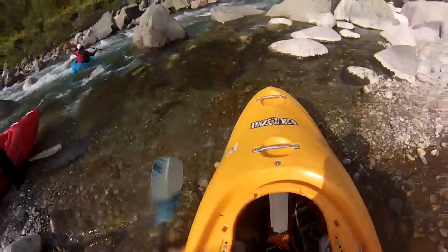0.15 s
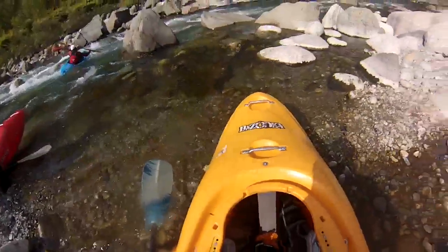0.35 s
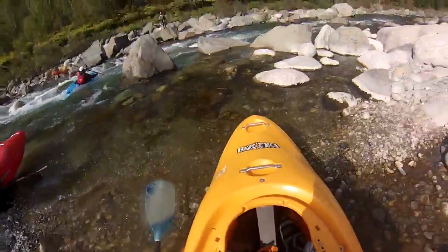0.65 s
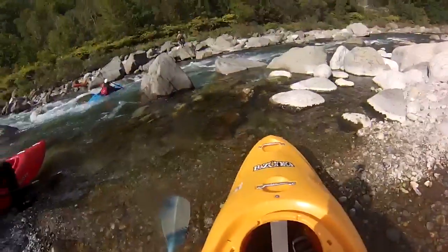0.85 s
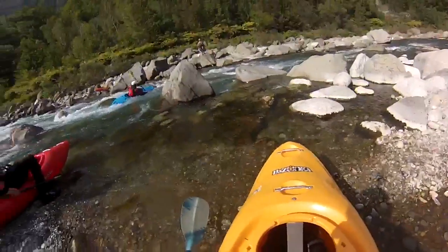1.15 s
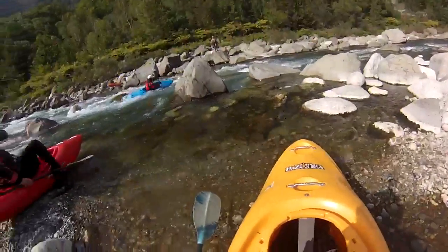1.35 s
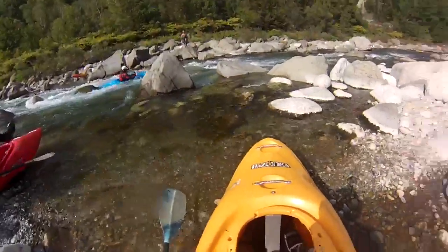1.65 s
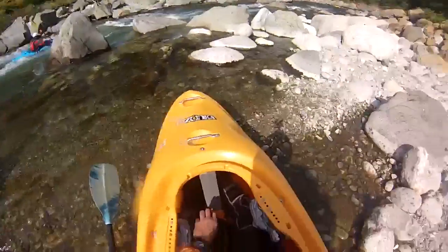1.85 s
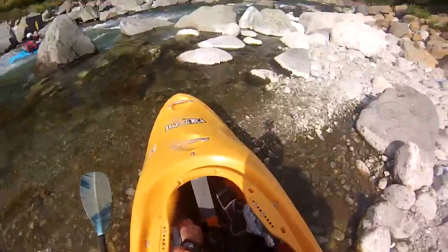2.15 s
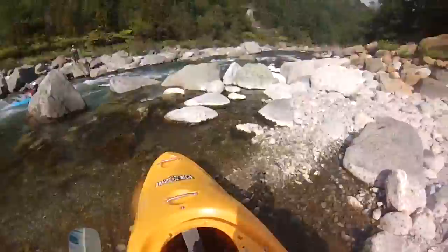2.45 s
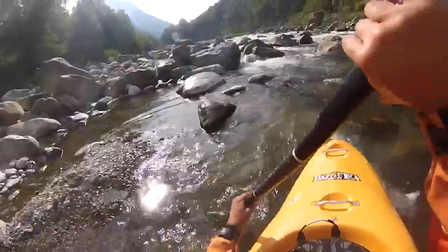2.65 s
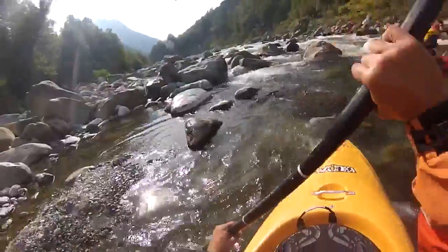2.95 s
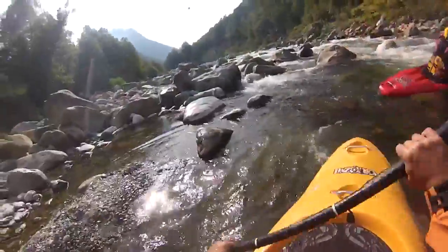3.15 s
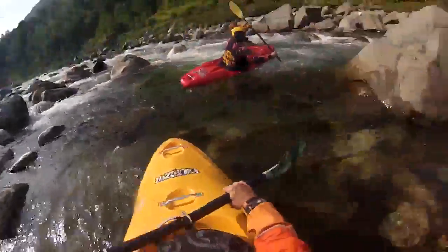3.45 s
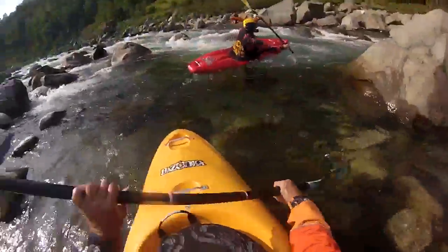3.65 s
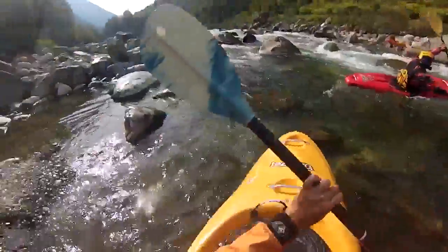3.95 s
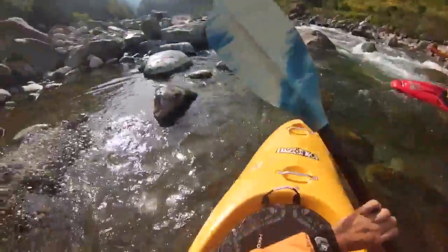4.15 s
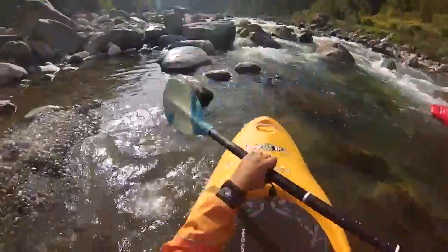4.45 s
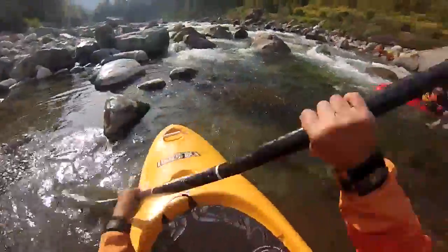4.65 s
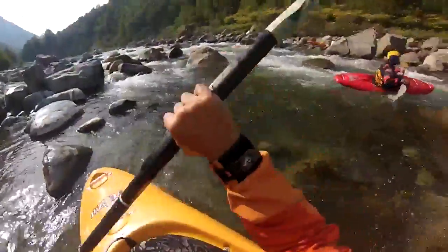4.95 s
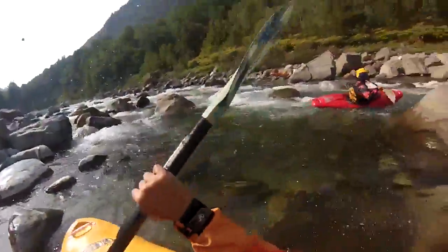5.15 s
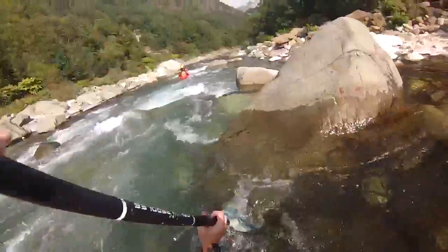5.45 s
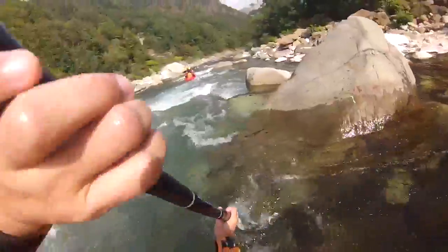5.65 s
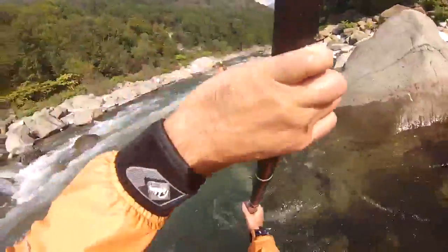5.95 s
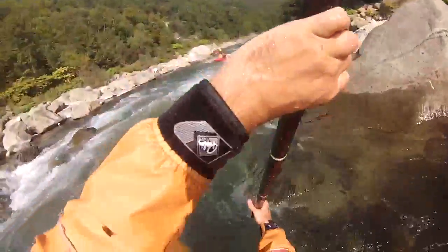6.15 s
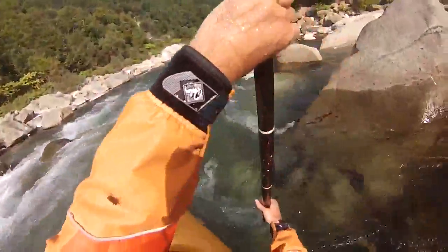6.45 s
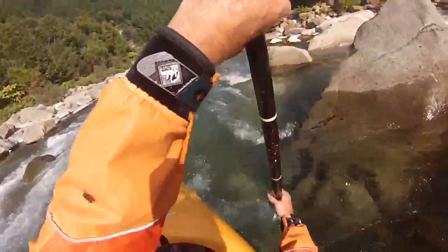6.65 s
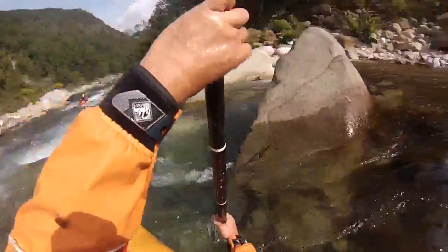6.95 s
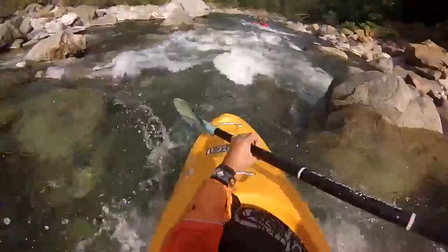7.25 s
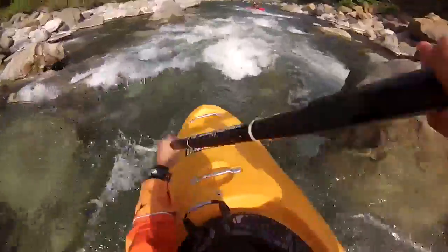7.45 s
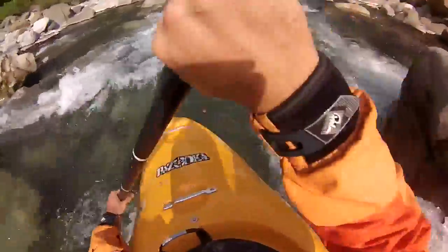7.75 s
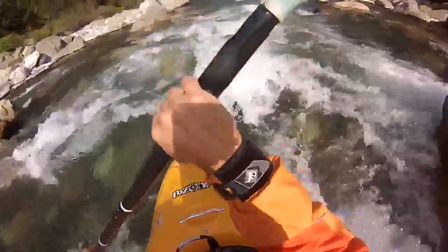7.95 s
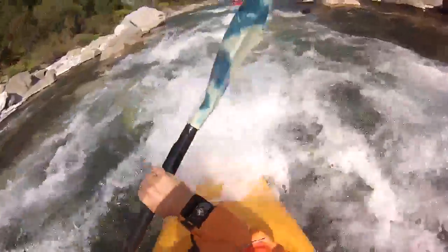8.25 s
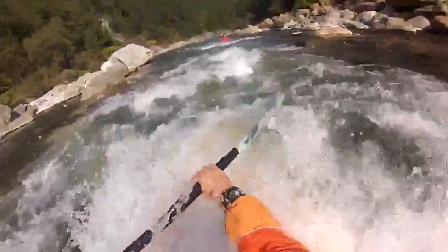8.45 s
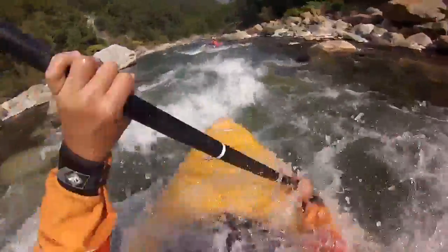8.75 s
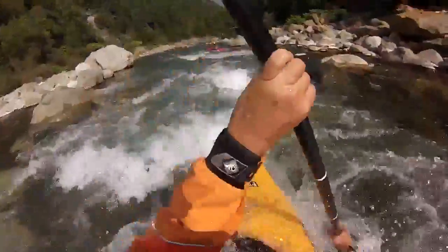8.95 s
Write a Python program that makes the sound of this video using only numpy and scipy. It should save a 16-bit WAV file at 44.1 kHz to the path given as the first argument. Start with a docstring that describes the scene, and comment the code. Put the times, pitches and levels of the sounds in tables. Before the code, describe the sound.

Heard from a kayaker's helmet through a sealed plastic housing, boxy and resonant. From 0 to 2.5 s, deep wind rumble, strongest at the very start, lies over the steady rush of rapids, with tiny drips, a dull hull plop near 1.4 s and a wind thump with a hollow knock at 2 s. A short fade to silence with a faint pop follows. From 2.6 to 3.05 s quick paddle splashes and pouring water burst out, then flowing water; plops and wind thumps come around 4 to 4.4 s, and sharp wet strokes from 4.7 to 5.05 s. After a gap at 5.25 s the rush grows fuller, with airy wind flurries. Another gap at 7.2 s leads to hull plops at 7.5 to 7.8 s and a loud, hissing whitewater surge peaking near 8.3 s, with splashes and buffeting until 8.8 s. A final gap at 9 s leaves a quieter wash.

```python
"""Wind buffets the microphone first, mostly deep rumble, over the broad roar of river rapids.
The microphone rides a kayaker's helmet in a sealed plastic housing, whose resonances colour the water noise.
Churn lies against the hull, roar far off, wash nearer, spray and mist on top: noises, some with bubble chirps.
Drops tick, paddle splashes ring and the hull plops, each a decaying tone with a burst of noise.
Five stretches of river, each with its own balance of water, are joined by short fades to silence."""
import sys
import numpy as np
from scipy import signal
from scipy.fft import rfft, irfft, next_fast_len
from scipy.io import wavfile
from scipy.ndimage import uniform_filter1d

SR = 44100
rng = np.random.default_rng(int(sys.argv[2]) if len(sys.argv) > 2 else 0)


def digitize_waveform(pressure):
    """Quantize a signal to 16-bit integers and store it at the path in sys.argv[1].

    Rows of a 2-D input are taken as channels; values are limited to [-1, 1].
    """
    field = np.atleast_2d(pressure).T
    bounded = np.clip(field, -1, 1)
    quanta = np.round(bounded * 32767).astype(np.int16)
    wavfile.write(sys.argv[1], SR, quanta)


N = 402191


def amp(db):
    """Decibels to gain."""
    return 10 ** (np.asarray(db) / 20)


def evened(x):
    """Scales to rms 1."""
    return x / np.sqrt(np.mean(x ** 2) + 1e-20)


def read(points, hz):
    """Reads a spectrum on a log-frequency axis."""
    f, value = np.transpose(points)
    return np.interp(np.log(hz + 1), np.log(f + 1), value)


def curves(rows):
    """One curve per column of a table after the time, at every sample."""
    s, *columns = np.transpose(rows)
    t = np.arange(N) / SR
    return np.array([np.interp(t, s, column) for column in columns])


def add(mix, s, sound):
    """Mixes a sound in at time s, cut off at the end of the mix."""
    start = max(round(s * SR), 0)
    part = mix[start:][:len(sound)]
    part += sound[:len(part)]


def coloured(spectrum):
    """Steady noise from one long transform, fine enough in frequency for the deep bass."""
    size = next_fast_len(N, real=True)
    hz = np.fft.rfftfreq(size, 1 / SR)
    bins = rfft(rng.standard_normal(size)) * amp(read(spectrum, hz))
    return evened(irfft(bins, size)[:N])


def wind(steadiness=0.61):
    """Turbulence on the microphone port: lumpy rumble in gusts, faster air in flurries, hard buffets."""
    # gusts: (time [s], strength [dB])
    gust_points = [(0, -19.5), (.12, -29), (.45, -34.5), (.8, -26.5), (1.1, -33.5), (1.3, -29),
                   (1.6, -36.5), (1.95, -26.5), (2.4, -33), (2.75, -30.5), (3.0, -34), (3.35, -33.5),
                   (3.6, -35), (4.2, -24.5), (4.32, -34.5), (4.55, -33.5), (4.95, -29), (5.08, -31),
                   (5.16, -35.5), (6.0, -36.5), (6.16, -29.5), (6.24, -36.5), (6.6, -37), (6.85, -34.5),
                   (7.15, -35), (7.5, -32.5), (7.8, -30.5), (8.3, -31), (8.6, -27), (9.12, -34)]
    # deep turbulence: (frequency [Hz], relative density [dB per Hz])
    rumble_spectrum = [(4.7, 2.5), (8.0, 1), (21, 2.5), (41, -2.5), (49, -10), (56, -11.5), (62, -41),
                       (70, -47), (110, -39), (140, -62), (240, -120)]
    # faster air: (frequency [Hz], relative density [dB per Hz])
    whoosh_spectrum = [(40, -24), (60, 30), (85, 16.5), (120, 10.5), (200, -37.5)]
    # flurries of faster air: (middle [s], half-width to 1/e [s], level [dB])
    flurry_rows = [(0, .03, -57), (.3, 0.16, -55), (1.6, 0.11, -62), (2.01, 0.022, -35), (3.0, 0.27, -55.5),
                   (5.8, .06, -43.5), (6.03, 0.24, -42.5), (6.84, 0.065, -35.5), (7.87, 0.042, -46),
                   (8.41, 0.036, -48), (8.62, 0.051, -40), (8.84, .06, -45.5)]
    # single strong buffets: (middle [s], level [dB], pitch [Hz], push + or pull - [gain])
    buffet_rows = [(2.008, -10, 38, 1), (2.152, -18, 29.3, 0.97), (2.71, -19, 14.6, 0.97),
                   (3.337, -23, 25, -1.1), (4.063, -14.5, 27, -0.91), (4.409, -13.5, 22, -1),
                   (6.851, -19, 30, -0.87), (7.782, -24.5, 18, 1), (8.179, -16.5, 24.5, 1),
                   (8.377, -20, 28, 1), (8.589, -10, 24.4, -0.69), (8.627, -15.5, 18, 0.86),
                   (8.798, -19.5, 18.6, -1)]
    whoosh_db = -33  # steady airflow, relative to the gust strength

    t = np.arange(N) / SR
    gust = amp(curves(gust_points)[0])
    flurry = sum(amp(db) * np.exp(-((t - s) / width) ** 2) for s, width, db in flurry_rows)

    rumble = coloured(rumble_spectrum)
    # dividing by part of its own loudness makes the rumble steadier, yet still lumpy
    lumps = uniform_filter1d(abs(rumble), size=3000) + 0.064
    out = gust * evened(rumble / lumps ** steadiness)
    out += (gust * amp(whoosh_db) + flurry) * coloured(whoosh_spectrum)

    t = np.arange(-3000, 3000) / SR
    for s, db, hz, sign in buffet_rows:
        u = (np.pi * hz * t) ** 2
        lump = (1 - 2 * u) * np.exp(-u)  # one pressure lump with a rebound either side
        add(out, s + t[0], sign * amp(db) * lump)
    return out


def noise(spectrum, size, patchy_db=0., flicker_db=0.):
    """Random short-time spectra with drifting patches and a flicker shared by all bands."""
    frames, hz = 4 * N // size + 5, np.fft.rfftfreq(size, 1 / SR)
    real, imaginary, patches = rng.standard_normal((frames, len(hz), 3)).T
    # patches are smoothed over frequency, then over time
    patches = uniform_filter1d(patches, size=8, axis=0)
    patches = evened(uniform_filter1d(patches, size=12, axis=1))
    flicker = evened(uniform_filter1d(rng.standard_normal(frames), size=3))
    level_db = read(spectrum, hz)[:, None] + patchy_db * patches + flicker_db * flicker
    bins = (real + 1j * imaginary) * amp(level_db)
    return evened(signal.istft(bins, nperseg=size, noverlap=3 * size // 4)[1][:N])


def housing(x):
    """Sealed shell: a flat leak plus cavity resonances, as a causal (minimum-phase) filter."""
    # cavity resonances: (frequency [Hz], width [Hz], gain over the flat leak [dB])
    resonances = [(1100, 450, 5), (690, 150, 0.5), (1449, 320, 13), (1658, 180, 6), (2395, 480, 14),
                  (3120, 160, 4), (3600, 520, 4.5), (4020, 310, 0.5), (4900, 270, 3), (5370, 270, 4),
                  (6600, 910, -5), (7830, 430, 1.5), (10440, 1000, -4)]
    hz = abs(np.fft.fftfreq(4096, 1 / SR))
    power = 1 + sum(amp(db) ** 2 / (1 + (2 * (hz - f) / w) ** 2) ** 2 for f, w, db in resonances)
    log_gain = np.log(power) / 2
    phase = -signal.hilbert(log_gain).imag
    taps = np.fft.ifft(np.exp(log_gain + 1j * phase)).real[:2048]
    return signal.oaconvolve(x, taps)[:len(x)]


def bubbles(per_s, lo_hz, hi_hz, cycles, spread_db):
    """Bursting bubbles: short rising chirps at nine pitches, many weak and a few strong."""
    strength = amp(spread_db * np.minimum(rng.exponential(1, N), 5))
    strength = strength * (rng.random(N) < per_s / SR)
    kind, out = rng.integers(0, 9, N), np.zeros(N)
    for k, hz in enumerate(np.geomspace(lo_hz, hi_hz, num=9)):
        turns = np.arange(0, 3 * cycles, hz / SR)
        chirp = np.sin(2 * np.pi * turns * (1 + 0.028 * turns)) * np.exp(-turns / cycles * 2)
        out += signal.oaconvolve(strength * (kind == k), chirp)[:N]
    return evened(out)


def water_levels():
    """Gain of each water layer: the stretch's balance, lifted by the swell, with pours added in power."""
    # stretches of river: (start [s], churn round the hull [dB], far roar [dB], nearer wash [dB],
    # spray [dB], fine mist [dB]), all before the swell
    stretches = np.array([(0, -55, -55, -62, -63.5, -70), (2.556, -51.5, -58, -58.5, -62.5, -70),
                          (5.29, -51.5, -52.5, -55.5, -63, -68.5), (7.256, -49, -48.5, -51, -53.5, -59.5),
                          (9.056, -56, -55.5, -51, -59, -63)])
    # as the boat nears white water all layers swell:
    # (time [s], swell [dB], extra churn against the hull [dB])
    swell_rows = [(0, 1.5, 3), (.08, -0.5, 1.5), (.5, -2.1, .5), (1.6, -2.3, 0), (2.5, -1.2, 0.7),
                  (3.5, -0.7, -1.6), (4.3, 0.5, 0.5), (5.25, 3.5, -2), (5.33, 2.4, -2), (6.0, 3.8, 1),
                  (6.4, 5, 0), (7.2, 5, -1), (7.3, -0.8, -2.5), (7.6, -1, 3.5), (7.82, 3.5, 4.5),
                  (8.25, 8.5, 1), (8.6, 6.5, 3.5), (9.0, 4.5, 2), (9.1, -6.5, 1)]
    # response to the swell: (churn, roar, wash, spray, mist) [dB per dB]
    follow = (.3, .7, .9, .95, 1.05)
    # water pouring off a paddle or over a rock:
    # (start [s], time until it falls [s], level [dB], brightness [dB per layer])
    pour_rows = [(0.714, 0.29, -64.5, 8), (1.17, .12, -65, 7), (2.61, 0.14, -52, -1),
                 (2.752, 0.14, -48, -.3), (2.956, 0.051, -51, .3), (4.386, 0.12, -55.5, 4),
                 (4.73, 0.069, -61.5, -19), (4.825, 0.08, -44, -.3), (4.903, 0.059, -43, -1),
                 (5.023, 0.086, -51, 1), (8.51, 0.12, -44.5, -11)]
    # balance of a pour: (roar, wash, spray, mist) [dB]
    pour_balance = np.array((-8.5, -1.7, -12, -21.5))
    rise_s, fall_s = 0.016, 0.038  # linear rise, fall to 1/e

    t = np.arange(N) / SR
    swell_db, churn_db = curves(swell_rows)
    stretch_db = stretches[np.searchsorted(stretches[1:, 0], t), 1:].T
    gain = amp(stretch_db + np.outer(follow, swell_db))
    gain[0] *= amp(churn_db)

    power = gain ** 2
    for start, length, db, bright_db in pour_rows:
        rise = np.clip((t - start) / rise_s, 0, 1)
        fall = np.exp(-np.maximum(t - start - length, 0) / fall_s)
        layer_db = db + pour_balance + bright_db * np.arange(-1, 3)
        power[1:] += np.outer(amp(layer_db), rise * fall) ** 2
    return np.sqrt(power)


def river():
    """Churn, roar, wash, spray and mist: dense noise, with bubbles standing out of three of them."""
    # water against the hull: (frequency [Hz], relative density [dB per Hz])
    churn_spectrum = [(60, -2), (110, 0.5), (200, -3.5), (400, -4.5), (800, -9), (1300, -16), (2500, -42)]
    # far rapids: (frequency [Hz], relative density [dB per Hz])
    roar_spectrum = [(500, -46), (900, -5), (1400, 4), (1900, -2), (2600, -13.5), (5000, -27)]
    # nearer water: (frequency [Hz], relative density [dB per Hz])
    wash_spectrum = [(500, -26), (750, 0.5), (1400, -14.5), (2000, 1.5), (2600, -8.5), (3300, -7.5),
                     (5000, -15), (9000, -66)]
    # spray: (frequency [Hz], relative density [dB per Hz])
    spray_spectrum = [(1200, -16), (2400, -4), (3500, 2.5), (5000, 5.5), (6500, -5), (7500, -16),
                      (10000, -45)]
    # fine mist: (frequency [Hz], relative density [dB per Hz])
    mist_spectrum = [(4000, -33), (6000, 5.5), (7600, -1.5), (8400, -5.5), (9300, -8), (11500, -8.5),
                     (13000, -15), (15500, -20)]

    churn = noise(churn_spectrum, size=1024, patchy_db=-0.5)
    churn += 0.36 * bubbles(65, 152.0, 832, 15.0, 2.8)
    roar = noise(roar_spectrum, size=512, patchy_db=.6, flicker_db=.4)  # distant, so smooth: no bubbles
    wash = noise(wash_spectrum, size=512, patchy_db=1.3, flicker_db=0.25)
    wash += .5 * bubbles(300, 959, 3270, 3.4, 2.3)
    spray = noise(spray_spectrum, size=256, patchy_db=-0.5, flicker_db=1.16)
    spray += 0.43 * bubbles(900, 3000, 6080, 16.0, 1.7)
    mist = noise(mist_spectrum, size=256, patchy_db=0.95, flicker_db=1.5)
    layers = [churn, roar, wash, spray, mist]
    return sum(gain * evened(housing(layer)) for gain, layer in zip(water_levels(), layers))


def electronics():
    """Faint hiss of the microphone electronics and thin steady whines of the camera's."""
    # microphone hiss: (frequency [Hz], relative density [dB per Hz])
    hiss_spectrum = [(2000, -15), (8000, -5), (12000, -4.5), (15500, -13)]
    # camera whines: (frequency [Hz], rms level [dB])
    whine_rows = [(10492, -95), (12290, -96), (13964, -93)]
    hiss_db = -75  # rms
    t = np.arange(N) / SR
    whine = np.zeros(N)
    for hz, db in whine_rows:
        whine += np.sqrt(2) * amp(db) * np.sin(2 * np.pi * (hz * t + rng.random()))
    return amp(hiss_db) * noise(hiss_spectrum, size=512) + whine


def burst(white, centre_hz, octaves):
    """A short noise coloured round one centre and heard through the housing."""
    hz = np.fft.rfftfreq(len(white), 1 / SR)
    colour = np.exp(-(np.log2(hz / centre_hz + 1e-9) / octaves) ** 2)
    return evened(housing(irfft(rfft(white) * colour, len(white))))


def ticks():
    """Small drops on hard surfaces: a bright spit with a short tone ringing in it."""
    # drops: (time [s], level [dB], ring pitch [Hz])
    drop_rows = [(0.0473, -52, 5030), (0.0857, -50, 5100), (0.1181, -51, 5030), (0.1506, -51, 5140),
                 (0.2094, -47.5, 4960), (0.3651, -50, 4830), (0.9244, -54, 6130), (0.974, -51, 6100),
                 (1.1994, -55, 7600), (1.9245, -50, 4600), (2.0073, -48, 3580), (2.5057, -42, 3500),
                 (2.6287, -40.5, 3500), (2.662, -44, 4850), (2.7636, -37.5, 3530), (2.816, -35, 3500),
                 (2.8424, -34.5, 3660), (2.8564, -43, 3600), (2.8759, -53, 3600), (2.9991, -47, 4750),
                 (3.0185, -44, 3500), (3.9983, -49, 3660), (4.4014, -52, 5160), (4.67, -43, 4900),
                 (4.8319, -43, 4900), (4.849, -41, 3550), (4.8898, -45, 3940), (4.982, -41, 3750),
                 (5.039, -46, 4420), (5.0944, -48, 4070), (6.6004, -54, 4060), (7.6016, -40, 4160),
                 (8.1194, -35.5, 6260), (8.8075, -33.5, 3440)]
    t60_s = 0.033
    out, t = np.zeros(N), np.arange(3072) / SR
    for s, db, hz in drop_rows:
        spit = burst(rng.standard_normal(len(t)), np.sqrt(hz * 5200), .6)
        bead = np.sin(2 * np.pi * hz * t)
        onset = 1 - np.exp(-t / 0.0004)
        add(out, s, amp(db - 60 * t / t60_s) * (.6 * spit + .45 * bead) * onset)
    return out


def splashes():
    """A trapped bubble rings and rises in pitch inside a wide slap of noise."""
    # slaps of water: (time [s], level [dB], starting bubble pitch [Hz])
    slap_rows = [(0.366, -43, 1370), (2.007, -40, 610), (2.615, -34, 2120), (2.634, -33, 2030),
                 (2.658, -39, 2400), (2.686, -33, 2110), (2.698, -34, 1050), (2.739, -32.5, 1530),
                 (2.767, -36, 2470), (2.8, -33.5, 1040), (2.816, -35, 2180), (2.824, -29, 1860),
                 (2.877, -31, 2400), (2.942, -39, 2540), (3.017, -47, 1350), (3.045, -40.5, 1460),
                 (4, -34.5, 800), (4.012, -39, 920), (4.301, -38, 710), (4.31, -51, 1150),
                 (4.511, -41, 1930), (4.673, -25, 2396), (4.676, -28, 1244), (4.789, -37, 1240),
                 (4.805, -37, 1680), (4.831, -36, 2430), (4.848, -31, 1370), (4.927, -29.5, 2150),
                 (5.04, -37, 1090), (7.611, -41, 1490), (7.782, -32, 2040), (8.116, -31.5, 1420),
                 (8.645, -36, 2120)]
    t60_s = 0.049
    out, t = np.zeros(N), np.arange(4096) / SR
    for s, db, hz in slap_rows:
        # the slap's centre leans towards the middle range
        slap = burst(rng.standard_normal(len(t)), np.sqrt(hz * 1900), 1.2)
        bubble = np.sin(2 * np.pi * hz * t * (1 + 3.5 * t))
        onset = 1 - np.exp(-t / 0.0001)
        add(out, s, amp(db - 60 * t / t60_s) * (.4 * bubble + .45 * slap) * onset)
    return out


def knocks():
    """Knocks, mostly air trapped under the plastic hull: a dull puff and a rising note with two weak overtones."""
    # hollow plops against the hull, and at 2.004 s a low knock inside the wind buffet: # (time [s], level [dB],
    # starting pitch [Hz], ring t60 [s])
    plop_rows = [(1.388, -35, 323, 0.057), (1.930, -34.5, 394, 0.076), (1.938, -46, 1255, 0.071),
                 (2.004, -31.5, 130, 0.089), (2.006, -54, 298, 0.044), (4, -37, 238, 0.059),
                 (4.008, -40, 500, .072), (4.284, -43, 275, 0.1), (4.33, -32.5, 222, 0.15),
                 (4.672, -34, 470, 0.034), (6.821, -37, 214, 0.076), (7.5, -31.5, 416, 0.069),
                 (7.516, -31, 1100, .05), (7.63, -39, 270, .07), (7.735, -42, 600, 0.079),
                 (7.75, -34, 225, 0.1), (7.806, -36, 647, .072)]
    thud_db, thud_t60_s = -10, 0.052  # the dull puff, relative to its plop
    overtones = [(1, 0.71), (1.9, 0.037), (3.4, 0.044)]  # (pitch ratio, gain)
    out, t = np.zeros(N), np.arange(8000) / SR
    for s, db, hz, t60 in plop_rows:
        turns = hz * t * (1 + 1.24 * t)
        ring = sum(g * np.sin(2 * np.pi * ratio * turns) for ratio, g in overtones)
        ring = ring * amp(-60 * t / max(t60, .005))
        puff = burst(rng.standard_normal(len(t)), 1.33 * hz, 1.74)
        thud = amp(thud_db - 60 * t / thud_t60_s) * puff
        onset = 1 - np.exp(-t / 0.0013)
        add(out, s, amp(db) * (ring + thud) * onset)
    return out


def scene():
    """Everything that reaches the microphone."""
    return (wind() + river() + ticks() + splashes() + knocks())[None]


def record(dry):
    """Adds the electronics, fades each stretch out and the next in, adds pops, then limits the band."""
    # joins between stretches: fade-out starts [s]
    fade_starts = [2.472, 5.205, 7.172, 8.972]
    # the signal jumps once inside a fade-out and drains away: (time [s], jump level [dB])
    pop_rows = [(2.5254, -35), (5.2586, -37), (9.024, -49)]
    fade_s, silence_s, pop_t60_s = .068, .032, 0.015
    edge_hz = 15280  # top of the band

    t = np.arange(N) / SR
    fade = np.ones(N)
    for start in fade_starts:
        corners = start + np.cumsum([0, fade_s, silence_s, fade_s])
        fade *= np.interp(t, corners, [1, 0, 0, 1])
    out = (dry[0] + electronics()) * fade
    for s, db in pop_rows:
        add(out, s, amp(db - 60 * t[:4000] / pop_t60_s))
    lowpass = signal.firwin(1023, edge_hz, window=("kaiser", 9), fs=SR)
    return signal.oaconvolve(out, lowpass, "same")[None]


dry = scene()
out = record(dry)
digitize_waveform(out)
```